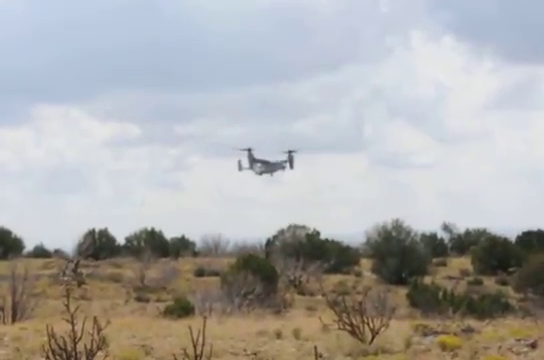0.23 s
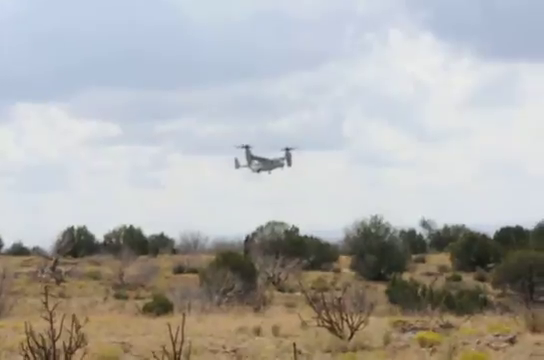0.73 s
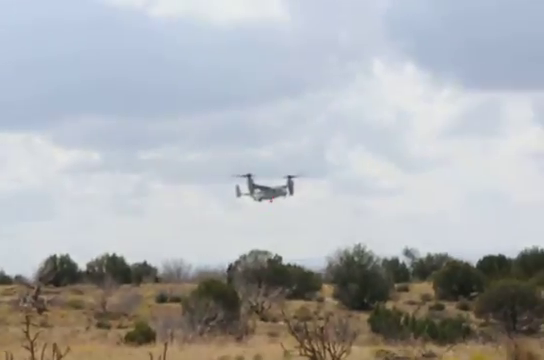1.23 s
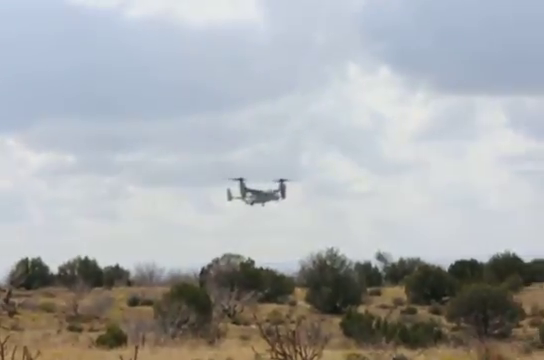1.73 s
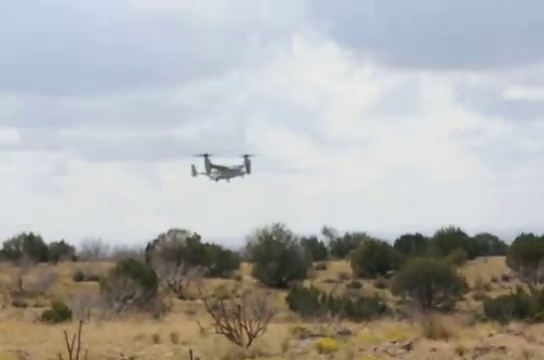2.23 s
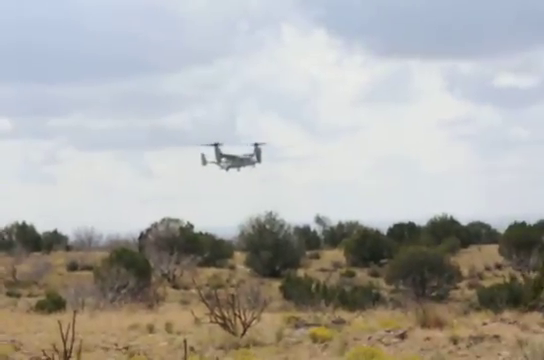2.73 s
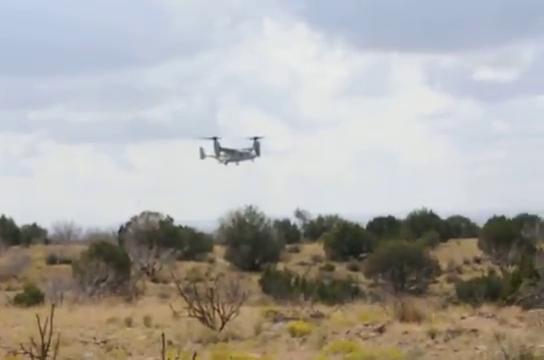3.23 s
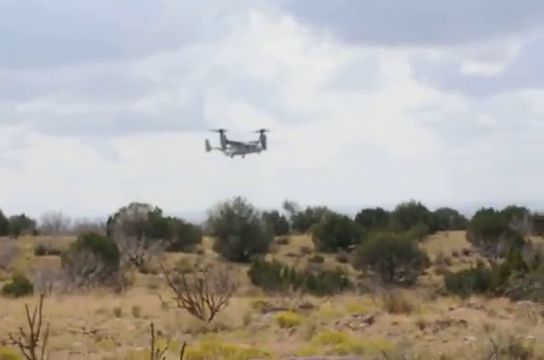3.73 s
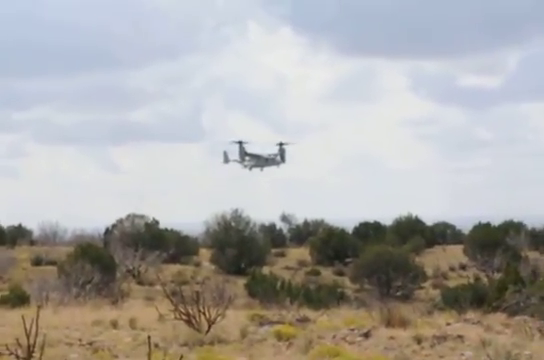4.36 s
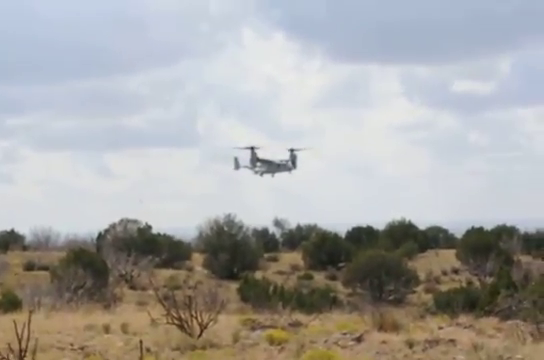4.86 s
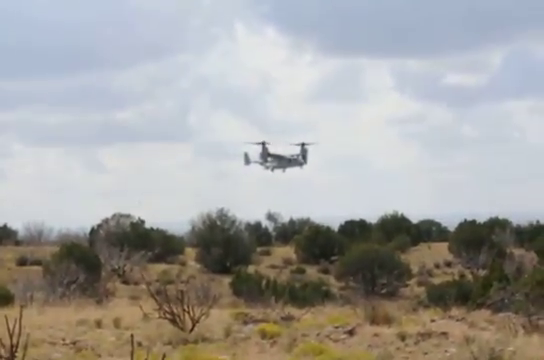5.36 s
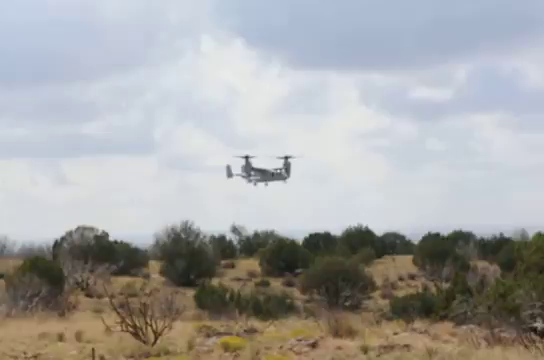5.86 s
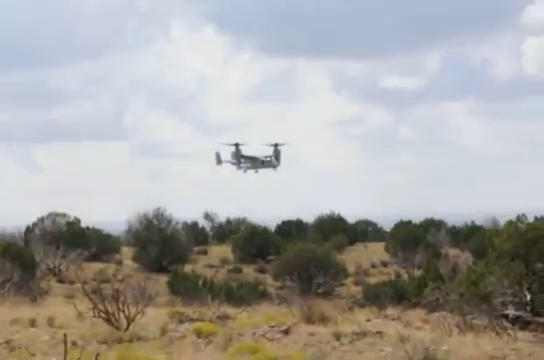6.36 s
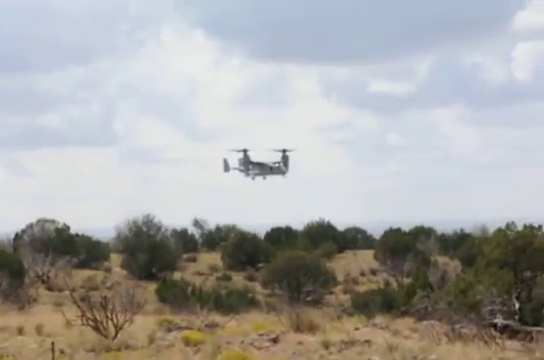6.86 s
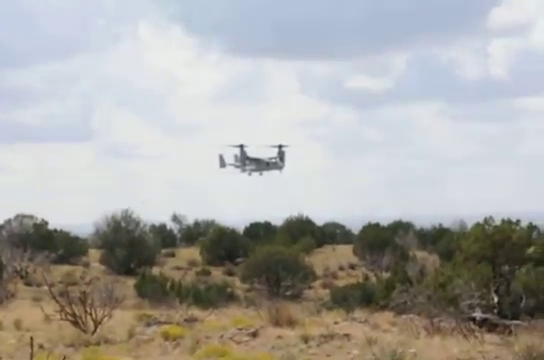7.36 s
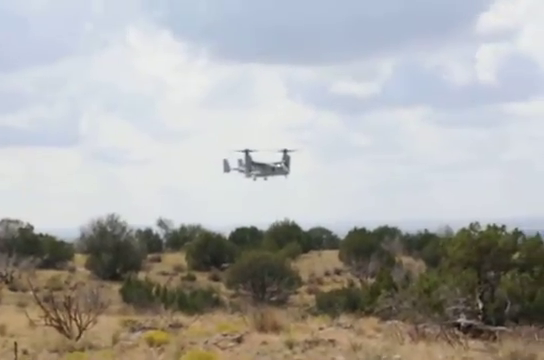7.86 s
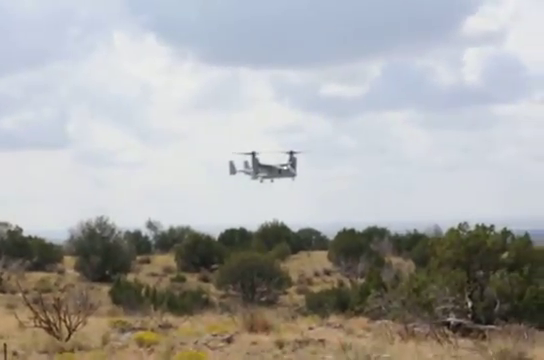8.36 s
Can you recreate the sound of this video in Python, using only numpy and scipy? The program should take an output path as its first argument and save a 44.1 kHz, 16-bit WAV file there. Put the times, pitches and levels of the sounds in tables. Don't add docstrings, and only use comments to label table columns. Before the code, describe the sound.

A continuous fast chopping drone from a large rotor aircraft some way off. Each beat is a low thump with a dry crack and brief scattered hiss; loudness jumps from beat to beat as moving air focuses it. Later a fainter trailing beat separates more clearly. Broad engine roar and a wavering midrange howl continue below. Soft wind rumbles come and go, strongest after six seconds, in narrow, overloaded small-camera sound.

```python
import sys
import numpy as np
from scipy import signal
from scipy.fft import rfft, irfft, next_fast_len
from scipy.io import wavfile
from scipy.ndimage import uniform_filter1d, map_coordinates

SR = 44100
rng = np.random.default_rng(int(sys.argv[2]) if len(sys.argv) > 2 else 0)


def voltage_ratio(decibels):
    exponent = np.asarray(decibels, float) / 20
    return 10 ** exponent


def generate_wav(sig):
    pcm = np.round(np.clip(np.atleast_2d(sig).T, -1, 1) * 32767).astype(np.int16)
    wavfile.write(sys.argv[1], SR, pcm)


N = 379260

BLADE_HZ = 21.2


def unit(x):
    return x / np.sqrt(np.mean(x ** 2) + 1e-20)


def columns(rows, s):
    at, *cols = np.transpose(rows)
    return [np.interp(s, at, c) for c in cols]


def wobble(rate):
    return map_coordinates(rng.standard_normal(int(N * rate / SR) + 4), [np.arange(N) * rate / SR])


def coloured(x, points, causal=False):
    m = 2 * next_fast_len(x.shape[-1] // 2 + 4096)
    f, db = np.transpose(points)
    gain = voltage_ratio(np.interp(np.log(np.fft.rfftfreq(m, 1 / SR) + 1), np.log(f + 1), db))
    if causal:
        cepstrum = irfft(np.log(gain), m)
        cepstrum[1:m // 2] *= 2
        cepstrum[m // 2 + 1:] = 0
        gain = np.exp(rfft(cepstrum))
    return irfft(rfft(x, m) * gain, m)[..., :x.shape[-1]]


def patchy(points, patchy_db):
    z = signal.stft(rng.standard_normal(N + 512), nperseg=512)[2]
    field = uniform_filter1d(rng.standard_normal(z.shape), size=5, axis=0)
    field = uniform_filter1d(field, size=8, axis=1)
    noise = signal.istft(z * voltage_ratio(patchy_db * unit(field)), nperseg=512)[1][:N]
    return unit(coloured(noise, points))


def chance(s):
    return rng.standard_normal(s.shape)


def drifting_noise(ms, memory):
    return signal.lfilter([1], [1, -memory], rng.standard_normal(ms.shape), axis=0)


def suction(ms, width, lobes=0):
    u = (ms / width) ** 2
    return (lobes * u - 1) * np.exp(-u / 2)


def air_focus(s):
    # first t/s, level/dB, length/s
    hard = [(1.187, -4, .02), (1.845, -4, .02), (2.221, 7, .11), (2.976, -1, .02), (3.401, 3, .11),
            (3.544, -6, .11), (3.685, 7, .02), (3.969, 2, .02), (4.11, -1, .02), (4.206, 3, .02),
            (4.348, 8, .02), (4.443, 5, .02), (4.68, 10, .02), (4.965, 10, .02), (5.06, 11, .02),
            (5.25, 10, .02), (5.58, 3, .02), (5.82, 10, .02), (6.01, 7, .02), (6.2, 9, .02),
            (6.294, 9, .02), (6.39, 9, .3), (6.82, 0, .02), (6.868, -8, .21), (7.2, -6, .11),
            (7.343, 5, .16), (7.628, 8, .02), (8.198, 4, .02), (8.39, 3, .07), (8.578, 8, .02)]
    blur_db = 5 * (0.34 + np.abs(chance(s)))
    focus_db = -blur_db * np.clip(s / 2 - .5, 0, 1)
    for at, db, length in hard:
        focus_db[(s > at - .5 / BLADE_HZ) & (s < at + length)] = db
    return focus_db


def thumps(s, ms, width, lobes, far_ms, far_db):
    width = width * np.exp(0.025 * chance(s))
    near = suction(ms, width, lobes)
    far = voltage_ratio(far_db) * suction(ms - far_ms, 1.68 * width, lobes)
    hump_share = np.clip(0.14 * (s - 5.1), 0, 1)
    return near + far - hump_share * suction(ms + 3.8, 0.46)


def cracks(s, ms, sharp, edge, echo_ms, focus_db):
    sharp = sharp * np.exp(0.11 * chance(s)) * voltage_ratio(-0.31 * focus_db)
    tick_db = -12 - 2.5 * s
    tick = suction(ms + 2.724, 0.22) - 1.1 * suction(ms + 0.6, 0.6)
    echo_db = -13.5 + 3.26 * chance(s)
    echo = suction(ms - echo_ms - 0.17 * chance(s), sharp, edge)
    return suction(ms, sharp, edge) + voltage_ratio(tick_db) * tick + voltage_ratio(echo_db) * echo


def scrub_scatter(s, ms, noise, focus_db):
    # f/Hz, level/dB
    scrub = [(400, -17.5), (1000, 9.5), (2200, 9), (4000, -8), (9000, -19)]
    bright = unit(coloured(noise, scrub))
    smooth = uniform_filter1d(bright, size=6, axis=1)
    dull = np.clip(.25 * (s - 2) - .1 * focus_db, 0, 1)
    after = np.clip(ms - .15, 0, None)
    rise = 1 - np.exp(-after / 0.51)
    smear_ms = 7.2 + 2.38 * s
    decay = voltage_ratio(-60 * after / smear_ms) + voltage_ratio(-21.5 - 60 * after / 60)
    return (bright + dull * (smooth - bright)) * rise * decay


def scrub_ring(s, ms, noise, focus_db):
    # t/s, f/Hz, level over the rest/dB
    pitched = [(.48, 2237, -1.5), (.63, 1487, 2.5), (1.3, 1270, 5), (2.101, 2710, 4), (2.35, 1980, 14),
               (2.8, 4540, -8), (2.97, 2100, 7.5), (3.28, 3960, 1.5), (3.5, 1290, 8.5), (3.85, 1395, 7),
               (4.1, 3490, 1.5), (4.399, 1380, 7), (5.601, 2720, 6.5), (5.799, 1443, 16), (6.4, 1354, 11.5),
               (7, 1416, 15.5), (7.3, 2510, 0), (7.602, 2290, 3), (8.2, 1270, 8)]
    when, pitch, peak = np.transpose(pitched)
    gap = np.abs(s - when)
    nearest = gap.argmin(axis=1)
    ring_hz = pitch[nearest, None]
    ring_db = peak[nearest, None] - 47.5 * gap.min(axis=1, keepdims=True)
    swell = unit(coloured(noise, [(250, 15.5), (700, -29)])) + 0.5
    fade_db = -60 * np.where(ms > 0, ms / 14, -ms / 0.5)
    tone = -swell * np.cos(2 * np.pi * ring_hz * ms / 1000)
    return tone * voltage_ratio(ring_db - 5.5 + fade_db + 0.53 * focus_db)


def ground_boom(ms, boom_db):
    # f/Hz, level/dB
    slopes = [(120, -30.5), (260, 3.5), (400, 2.5), (700, 2), (1100, -37)]
    rumble = unit(coloured(drifting_noise(ms, .93), slopes))
    boom = 0.77 * rumble - 0.66 * np.cos(2 * np.pi * 260 * ms / 1000)
    fade_db = -60 * np.where(ms > 0, ms / 55, -ms / 16)
    return voltage_ratio(boom_db + 4.0 + fade_db) * boom


def rotors():
    # t/s, delay/ms
    path = [(0, 14.9), (.67, 11), (1, 8.5), (1.66, 5.87), (2.25, 4.15), (3.4, 4.45), (3.7, 6.3), (4.3, 8),
            (4.63, 9.9), (5.3, 14.67), (6.29, 20.97), (6.7, 25.2), (6.96, 27.6), (7.29, 30.3),
            (7.63, 33.35), (7.96, 36.13), (8.6, 40.4)]
    # t/s, thump level/dB, crack level/dB, scatter level/dB
    near_slap = [(0, -26.5, -27, -12), (.3, -22.5, -22.5, -18.5), (.5, -14.5, -14.5, -5.5),
                 (.75, -24.5, -13.5, -17.5), (1.25, -22.5, -13.5, -15), (1.6, -18, -8, -19),
                 (1.95, -18.5, -18, -17), (2.08, -22, -27.5, -25.5), (2.3, -27, -21.5, -21.5),
                 (2.85, -21.5, -15, -20), (3.45, -23.5, -18, -22), (4.1, -22, -16.5, -23),
                 (4.85, -24, -32, -28), (5.65, -19.5, -18.5, -24.5), (6.5, -18, -19, -32.5),
                 (7, -20, -23, -23.5), (7.3, -16, -27.5, -18.5), (8, -16, -32.5, -35.5)]
    # t/s, thump width/ms, thump side lobes/0-1, ground echo lag/ms, far rotor lag/ms,
    # far rotor level/dB, crack side lobes/0-1, crack width/ms, ground boom level/dB
    attitude = [(0, 1.6, 0.28, 1.07, 2.2, -19.5, 1, 0.54, -25),
                (.7, 1.37, 1, 1.73, 2.9, -18.5, 0.66, .2, -17.5),
                (1.1, 0.13, 1, .9, 5.4, -4.5, 0.69, 0.13, -21.5),
                (1.5, 0.55, 0.77, 0.94, 6.8, -16.5, 0.52, .15, -23),
                (2, 0.39, 0.33, 1.54, 10, -9.5, 0.11, 0.11, -26),
                (2.5, 0.96, 0.01, 1.4, 11, -3.5, 0, 0.09, -24),
                (3.3, 1.15, 0.07, 2.64, 11, -16, 0.32, 0.12, -39.5),
                (4, 1.5, 0.5, 0.79, 15, -8, 0.77, 0.31, -25),
                (5.5, 1.07, 0.29, 1.5, 16.7, -11, 0, 0.17, -33.5),
                (7, 1.73, 0.5, 1.04, 18.5, -13, 1, 0.22, -29),
                (7.6, 1.4, 0.49, 5.5, 20, -9, 0.17, 0.16, -26.5),
                (8.6, 1.5, 0.3, 0.33, 23, -11, 1, 0.086, -21.5)]
    steady = np.arange(int(N / SR * BLADE_HZ)) / BLADE_HZ
    s = (steady + columns(path, steady)[0] / 1000)[:, None]
    index = np.round(s * SR).astype(int) + np.arange(-SR // 80, SR // 28)
    ms = (index / SR - s) * 1000 + 0.075 * chance(s)
    thump_db, crack_db, scatter_db = columns(near_slap, s)
    width, lobes, echo_ms, far_ms, far_db, edge, sharp, boom_db = columns(attitude, s)
    focus_db = air_focus(s)

    thump = thumps(s, ms, width, lobes, far_ms, far_db)
    slap = voltage_ratio(thump_db + 9 + 0.27 * chance(s) + 0.11 * focus_db) * thump
    crack = cracks(s, ms, sharp, edge, echo_ms, focus_db)
    slap += voltage_ratio(crack_db + 15.5 + focus_db) * crack
    noise = drifting_noise(ms, .85)
    scatter = voltage_ratio(0.13 * focus_db) * scrub_scatter(s, ms, noise, focus_db)
    scatter += scrub_ring(s, ms, noise, focus_db)
    slap += voltage_ratio(scatter_db + 6 + 1.4 * chance(s)) * scatter
    slap += ground_boom(ms, boom_db)
    return np.bincount(index.ravel() + SR, slap.ravel(), N + 2 * SR)[SR:SR + N]


def turbines():
    # t/s, level/dB
    roar_level = [(0, -37.5), (1.16, -39), (1.5, -44.5), (2.15, -46), (3.4, -42.5), (3.8, -43.5),
                  (4.9, -41), (6.1, -38), (6.46, -40), (6.8, -40.5), (7.3, -35.5), (7.8, -39), (8.6, -38.5)]
    # f/Hz, level/dB
    turbine = [(20, 3), (90, -2), (220, -9), (540, -15.5), (1100, -13.5), (2400, -17), (2750, -20.5),
               (3100, -27), (4300, -35.5), (5050, -44), (5400, -64), (9000, -76.5)]
    # t/s, level/dB
    howl_level = [(0, -32.5), (.15, -24.5), (.5, -21.5), (.74, -22), (1.4, -47), (2.47, -31), (3.14, -57),
                  (3.66, -28.5), (5.39, -33), (5.7, -33), (6.47, -34), (7.3, -28.5), (7.81, -38),
                  (8.6, -34)]
    # f/Hz, level/dB
    nozzle = [(900, -52.5), (1200, 0), (1400, -1.5), (1580, -0.5), (1800, -45)]
    t = np.arange(N) / SR
    roar_db = columns(roar_level, t)[0] + 11.0 + 1.2 * wobble(4.29) + 0.22 * wobble(23)
    howl_db = columns(howl_level, t)[0] - 7.5 + 0.4 * wobble(4.5)
    roar = voltage_ratio(roar_db) * patchy(turbine, patchy_db=1.5)
    return roar + voltage_ratio(howl_db) * patchy(nozzle, patchy_db=1.5)


def gusts():
    # peak t/s, peak level/dB, length/s
    gust_peaks = [(0.214, -27, 0.2), (0.363, -17.5, 0.17), (0.876, -27.5, 0.11), (1.039, -27.5, 0.29),
                  (1.567, -25, 0.25), (1.76, -22.5, .1), (1.948, -27, 0.054), (2.248, -36, 0.2),
                  (2.708, -29, 0.035), (3.316, -31, 0.17), (3.579, -27.5, 0.033), (4.067, -33.5, .12),
                  (4.464, -43, 0.6), (4.724, -32.5, 0.11), (5.017, -22.5, 0.28), (5.368, -20.5, 0.16),
                  (5.685, -35.5, 0.11), (5.919, -27.5, 0.53), (6.106, -17.5, 0.065), (6.219, -19, .05),
                  (6.395, -17.5, 0.13), (6.567, -16.5, .14), (6.674, -22.5, 0.068), (6.881, -26, 0.14),
                  (7.107, -17.5, 0.04), (7.474, -28, 0.2), (7.915, -22, 0.14), (8.216, -26.5, 0.05),
                  (8.357, -23, 0.27), (8.574, -21.5, 0.072)]
    breeze_db, rise = -44.5, 1
    t = np.arange(N) / SR
    power = np.full(N, voltage_ratio(breeze_db) ** 2)
    for at, peak_db, length in gust_peaks:
        near = slice(max(int((at - 3 * length) * SR), 0), int((at + 3 * length) * SR))
        u = (t[near] - at) / (length * np.where(t[near] < at, rise, 1) / 2)
        power[near] += voltage_ratio(peak_db) ** 2 * np.exp(-u ** 2)
    return np.sqrt(power)


def wind():
    # f/Hz, level/dB
    buffet = [(25, -30), (60, -4.5), (280, 4.5), (600, -1.5), (1000, -11.5), (1600, -20.5), (3000, -49)]
    port_top = .42
    lumps = voltage_ratio(1.2 * wobble(35) + 3 * wobble(90))
    push = gusts() * unit(lumps * patchy(buffet, patchy_db=1.6))
    return port_top * np.tanh(push / port_top)


def scene():
    return (rotors() + turbines() + wind())[None]


def clipped(x, top, hard):
    return x / (1 + np.abs(x / top) ** hard) ** (1 / hard)


def low_pass(x):
    return signal.sosfilt(signal.butter(12, 16500, fs=SR, output="sos"), x)


def record(dry):
    # f/Hz, level/dB
    microphone = [(300, 0), (950, -1), (1200, -0.95), (1420, -2.5), (1600, -4), (1780, -5.5), (2200, -3.44),
                  (3200, 3), (9000, -3)]
    # f/Hz, level/dB
    band_edge = [(15, -23.5), (40, -3), (100, 1.5), (3300, -0.5), (4200, -4), (5000, -10), (5700, -26.5),
                 (6400, -110)]
    x = clipped(coloured(dry, microphone, causal=True), top=.7, hard=40)
    x = clipped(coloured(x, band_edge), top=.712, hard=150)
    return low_pass(x)


dry = scene()
out = record(dry)
generate_wav(out)
```